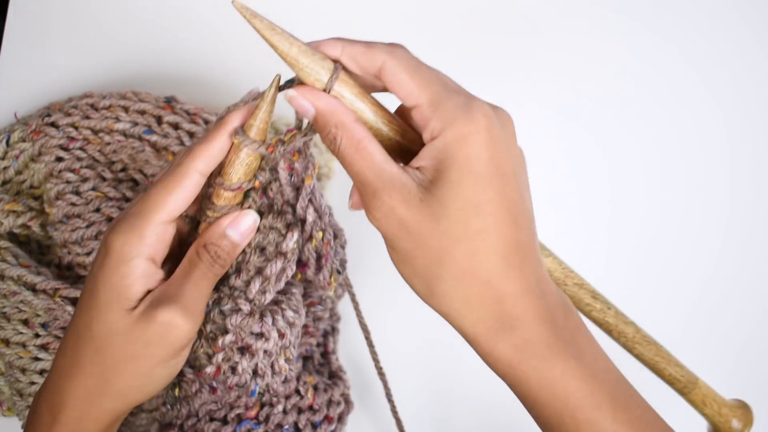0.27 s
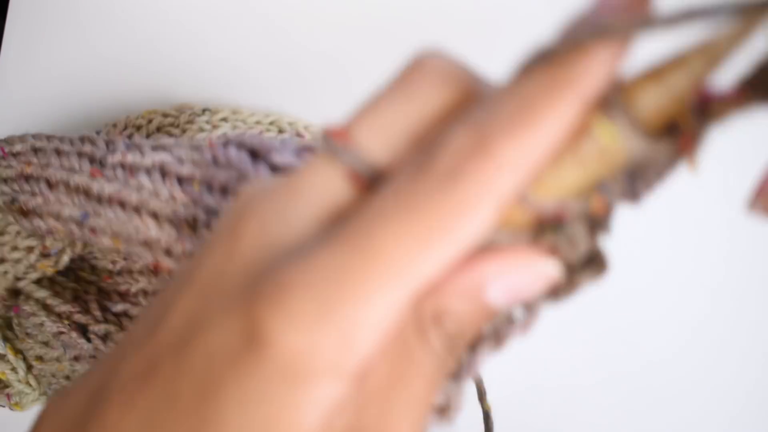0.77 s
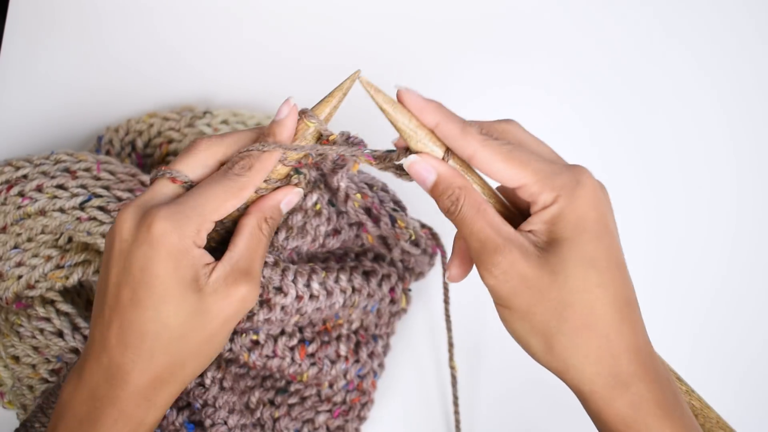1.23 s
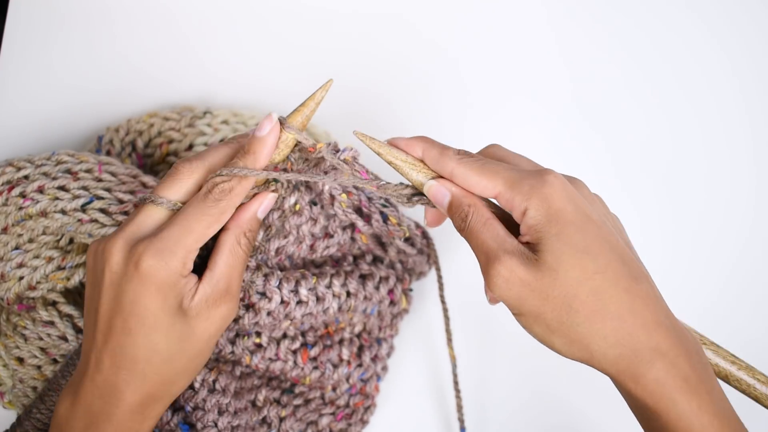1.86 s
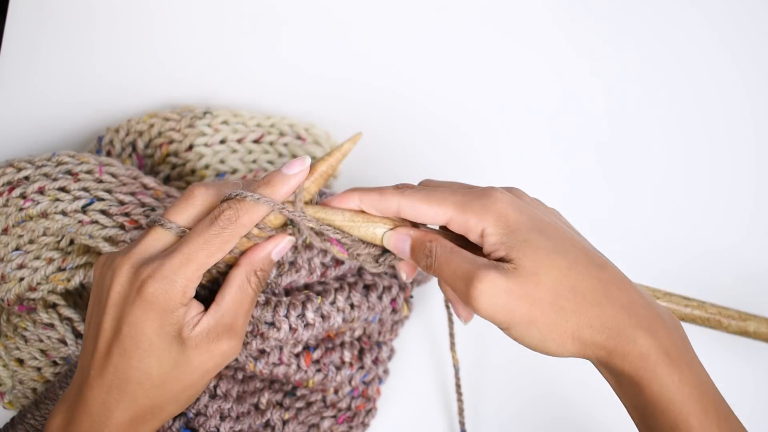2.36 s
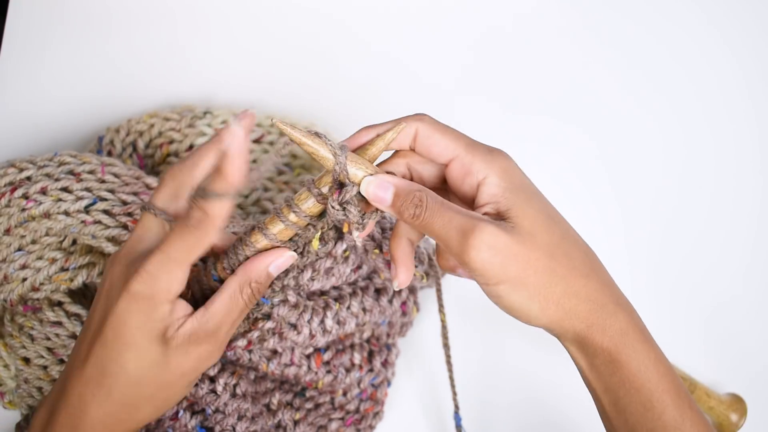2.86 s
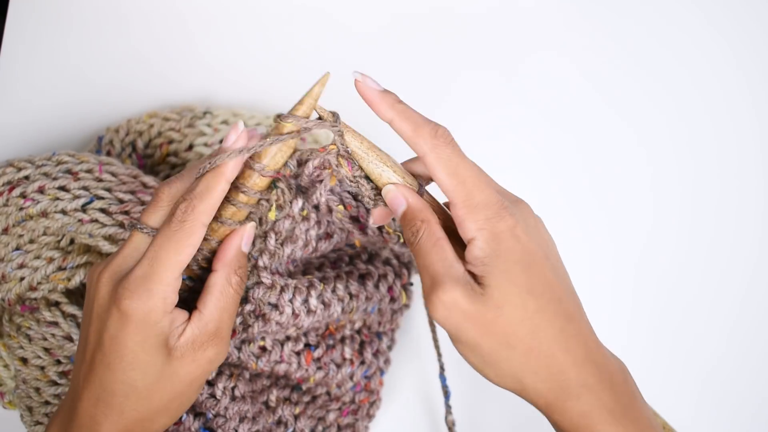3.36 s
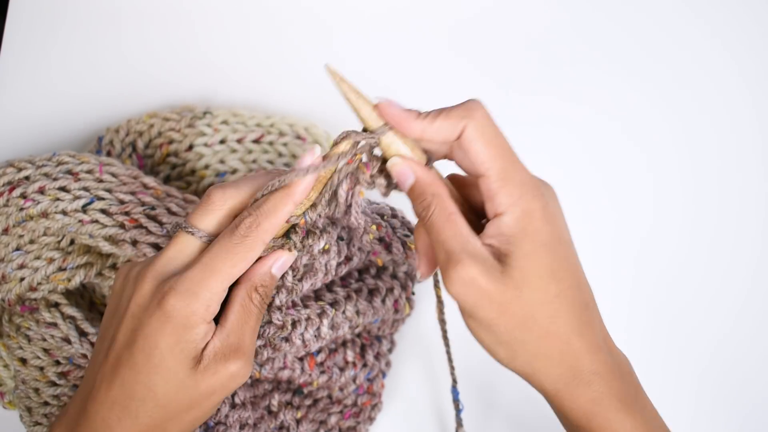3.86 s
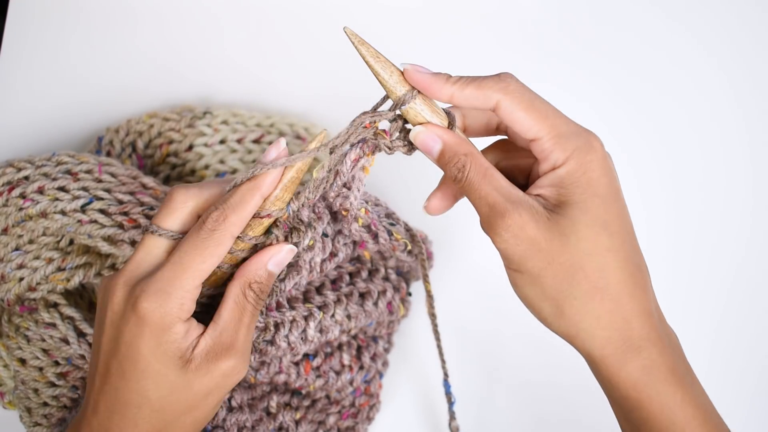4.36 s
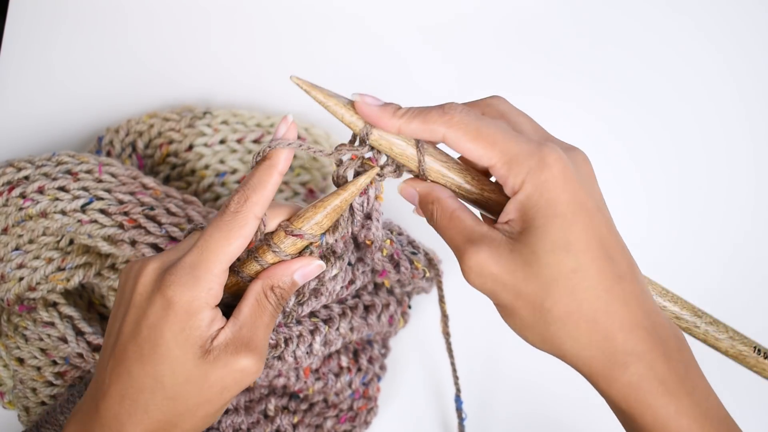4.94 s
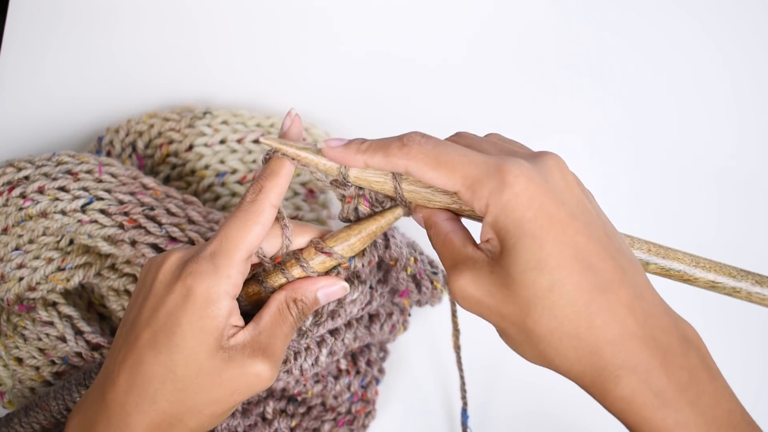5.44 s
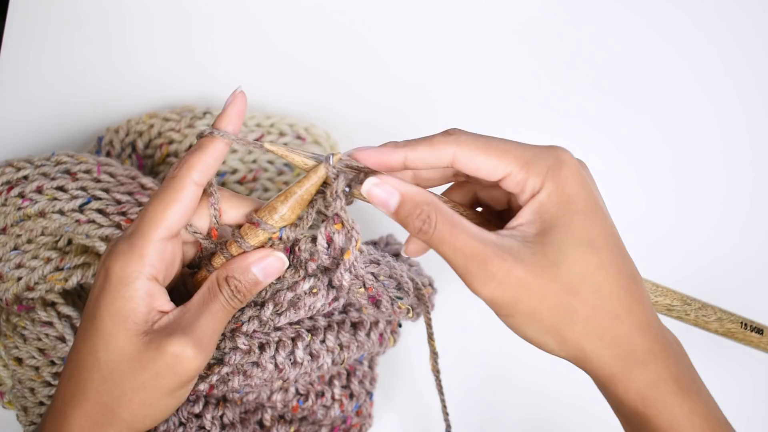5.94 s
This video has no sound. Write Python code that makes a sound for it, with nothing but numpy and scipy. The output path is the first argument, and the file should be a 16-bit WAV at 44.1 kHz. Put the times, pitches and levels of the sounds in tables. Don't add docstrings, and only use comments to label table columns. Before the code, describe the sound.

Close up in a quiet room, thick wooden knitting needles click lightly and brush through wool. Around two seconds the knob end knocks hard on a table three times, with soft scrapes and muffled landings between. Later the needle shafts clack together twice quickly, small ticks follow, and a last firm double knock ends with a sharp snap and a faint drag. Low room tone and slight hiss continue.

```python
import sys
import numpy as np
from scipy import signal
from scipy.fft import rfft, irfft, next_fast_len
from scipy.io import wavfile
from scipy.ndimage import uniform_filter1d

SR = 44100
rng = np.random.default_rng(int(sys.argv[2]) if len(sys.argv) > 2 else 0)


def to_wav(sig):
    pcm = np.clip(np.atleast_2d(sig), -1, 1) * 32767
    pcm = np.round(pcm).astype(np.int16)
    wavfile.write(sys.argv[1], SR, pcm.T)


def elevation(decibels):
    levels = np.asarray(decibels, float)
    return 10 ** (levels / 20)


N = 273420

# start in seconds, strength in dB, shaft ring over it in dB,
# crack over the shaft in dB, favoured board pitch in Hz.
KNOB_KNOCKS = [
    (2.021, -18.5, -10.5, -11.5, 888),
    (2.689, -16.5, -9, -12, 700),
    (3.106, -19.5, -11.5, -13.5, 880),
    (3.126, -26.5, -13, -19, 596),
    (3.705, -37.5, -23.5, -7.5, 610),
    (3.82, -43, -23.5, 0, 600),
    (5.692, -17, -8.5, -12, 910),
    (5.706, -22.5, -16.5, -11, 818),
]
# start in seconds, strength in dB, shaft ring over it in dB,
# crack over the shaft in dB, favoured shaft pitch in Hz.
SHAFT_CLACKS = [
    (0.4336, -40, -5, -6, 1790),
    (4.2713, -31.5, -0.5, -13.5, 1940),
    (4.31, -35.5, -2.5, -11, 1810),
    (4.329, -59, 11, -13, 1840),
]
TIP_SLIPS = [
    (3.4303, -51, 2.5, 10.5, 1190),
    (5.361, -55.5, -4.5, 10.5, 1130),
    (5.919, -29, -18.5, 16.5, 2040),
]
# start in seconds, peak in dB, pitch in Hz.
TIP_TICKS = [(0.8694, -66, 6720), (0.8794, -64, 6260), (1.2347, -45, 4960), (1.256, -57.5, 3180),
             (1.2638, -52.5, 5240), (1.2885, -69, 4260), (1.2913, -53.5, 5500), (1.9924, -56, 4700),
             (2.1498, -57.5, 4800), (2.2174, -60.5, 4850), (4.6094, -67, 4240), (4.7926, -64, 3050),
             (5.0515, -54, 6100), (6.1365, -62, 4610)]
# middle in seconds, length in seconds, level in dB, centre in Hz.
WOOL_STROKES = [(0.197, 0.13, -77, 5000), (.82, 0.02, -77, 3800), (0.88, 0.037, -73, 6500),
                (0.962, 0.057, -71, 5050), (1.03, 0.053, -67.5, 8500), (1.293, 0.022, -61, 4960),
                (1.499, 0.48, -76, 1290), (1.996, 0.045, -66.5, 7040), (2.223, 0.017, -73, 4000),
                (2.467, 0.13, -65, 6500), (2.532, 0.11, -70.5, 2300), (3.027, 0.081, -71.5, 6000),
                (3.227, 0.097, -63.5, 5660), (3.547, 0.15, -72, 5000), (3.949, 0.18, -73.5, 4970),
                (4.403, 0.011, -72, 5000), (4.88, 0.1, -79, 4000), (5.604, 0.073, -63.5, 6500),
                (5.827, 0.12, -69, 5000), (5.831, .11, -68.5, 1700)]
# strongest moment in seconds, length in seconds,
# ring in dB, thump over it in dB.
NEEDLE_DRAGS = [
    (2.25, 0.078, -62, 3),
    (3.245, .07, -60, -8),
    (4, 0.032, -78, 16.5),
    (4.81, 0.064, -69, 5),
    (5.844, 0.11, -55, -16),
    (6.2, 0.079, -59.5, -5),
]
# pitch in Hz, level in dB, t60 in seconds.
TABLE_THUMP = [(68, -25.5, 0.42), (131.6, -8, .14), (238.8, 2.5, 0.15), (299.6, -6.5, 0.085),
               (448, -3.5, 0.05)]
# pitch in Hz, level in dB, t60 in seconds.
BOARD_MODES = [(486, -19, 0.099), (533.5, -3, 0.067), (600, -3.5, 0.1), (701.6, 1.5, 0.051),
               (780, -36.5, 0.065), (874.6, 8.5, 0.043), (888, 4, 0.051), (977, -5, 0.066)]
# pitch in Hz, level in dB, t60 in seconds.
TOP_SWING = [(790, 0, .021)]
# pitch in Hz, level in dB, t60 in seconds.
SHAFT_MODES = [(1030, -6, 0.032), (1144, -1.5, 0.048), (1241, -5, 0.05), (1294, -14, 0.13),
               (1373, -6, 0.041), (1503, -4.5, 0.042), (1596, -8, 0.059), (1940, 3, 0.023),
               (2066, -0.5, 0.026), (2130, -3.5, 0.023), (2253, -6.5, 0.025), (2560, -6, 0.03)]
# pitch in Hz, level in dB, t60 in seconds.
BLUNT_CONTACT = [(2940, 1.5, 0.01), (3140, 3, .022), (3390, -1.5, 0.017), (4000, -6, 0.012),
                 (4505, -11, 0.027), (5080, -12.5, 0.031), (5890, -11.5, 0.011), (6500, -21.5, 0.024),
                 (7750, -22.5, 0.014)]
# pitch in Hz, level in dB, t60 in seconds.
SHARP_CONTACT = [(1600, -17, 0.0039), (2290, 10, 0.0088), (2900, 0.5, 0.017), (3165, 3.5, 0.019),
                 (3700, 9, 0.0038), (4270, -2.5, 0.01), (4610, 1.5, 0.017), (5050, -6, 0.026),
                 (5650, -1.5, 0.0089), (6030, -6.5, 0.021), (6500, -13.5, 0.022), (7400, -11.5, 0.0071),
                 (9000, -20, 0.0093), (10900, -12, .005)]
# centre in Hz, width in Hz, level in dB.
NEEDLE_RESONANCES = [(2100, 260, 1), (2960, 770, 6), (4600, 280, 9), (6000, 360, 4.5), (7500, 320, -11),
                     (10100, 2000, -8)]
# frequency in Hz, t60 in seconds.
ROOM_DECAY = [(150, 0.23), (700, 0.3), (1400, 0.35), (2100, 0.31), (3200, 0.21), (5000, 0.3), (12000, 0.29)]
# frequency in Hz, level in dB.
WALL_REFLECTION = [(300, 0.5), (700, -1), (1400, -0.5), (2100, -5), (2800, -6), (5000, -1.5)]
# frequency in Hz, level in dB per Hz.
ROOM_TONE = [(12, -29), (20, -9), (120, -2), (250, -5.5), (1030, -14.5), (2730, -22), (3720, -18),
             (15900, -29)]
# frequency in Hz, level in dB per Hz.
SIDE_HISS = [(12, -9), (20, -2.5), (221, -12.5), (409, -13.5), (822, -15.5), (1150, -17), (14600, -17.5),
             (15900, -32)]


def knocks():
    out = np.zeros((2, N))
    for s, db, shaft_db, crack_db, board_hz in KNOB_KNOCKS:
        shaft_hz = np.clip(1600 * 2 ** ((db + 18.5) / 12), 1200, 1900)
        knock = blow(db, shaft_db, crack_db, board_hz, shaft_hz, board_focus_db=12.5, shaft_focus_db=7.0,
                     contact=BLUNT_CONTACT, wet_db=-6.5)
        add(out, knock, s)
    return out


def clacks():
    out = np.zeros((2, N))
    for s, *levels, shaft_hz in SHAFT_CLACKS:
        clack = blow(*levels, 830, shaft_hz, board_focus_db=26, shaft_focus_db=12,
                     contact=BLUNT_CONTACT, wet_db=-9.0)
        add(out, clack, s)
    return out


def slips():
    out = np.zeros((2, N))
    for s, *levels, shaft_hz in TIP_SLIPS:
        snap = blow(*levels, 870, shaft_hz, board_focus_db=10, shaft_focus_db=49.5,
                    contact=SHARP_CONTACT, wet_db=-7)
        add(out, snap, s)
    return out


def blow(board_db, shaft_over_db, crack_over_db, board_hz, shaft_hz, board_focus_db, shaft_focus_db, contact, wet_db):
    t = np.arange(round(0.4 * SR)) / SR
    shaft_db = board_db + shaft_over_db
    padded_db = max(0, -shaft_over_db - 15.5)
    thump_db = board_db - 18 + 1.52 * padded_db

    crack = elevation(shaft_db + crack_over_db + 6.5) * ring(contact, t, rise=0.00014)
    shaft = ring(SHAFT_MODES, t, rise=0.00023, favoured_hz=shaft_hz, focus_db=shaft_focus_db)
    hard = crack + elevation(shaft_db + 1.5) * shaft

    swing_db = np.clip(4.3 * (board_db + 17.5), -10, 0)
    swing = -elevation(swing_db) * ring(TOP_SWING, t, rise=0.0011)
    board = ring(BOARD_MODES, t, rise=0.0012, favoured_hz=board_hz, focus_db=board_focus_db)
    board = elevation(board_db - 0.5) * (swing + elevation(-3.5) * board)
    thump = elevation(thump_db + 3) * ring(TABLE_THUMP, t, rise=0.002)

    near_hard = in_room(hard, wet_db, width_db=-48, blur_hz=400)
    return near_hard + in_room(board + thump, wet_db=-11, width_db=-54, blur_hz=111)


def ticks():
    out = np.zeros((2, N))
    t = np.arange(round(0.15 * SR)) / SR
    for s, db, hz in TIP_TICKS:
        modes = [(0.71 * hz, -6, 0.008), (hz, 0, 0.012), (1.29 * hz, -8, 0.006), (2.05 * hz, -8, 0.005)]
        tick = elevation(db + 7.0) * ring(modes, t, rise=0.0001)
        add(out, in_room(tick, wet_db=-9.5, width_db=-38, blur_hz=600), s)
    return out


def wool():
    def needle(f):
        peaks = sum(elevation(g) * f * w / (c * c - f * f + 1j * f * w) for c, w, g in NEEDLE_RESONANCES)
        return 0.35 + np.abs(peaks)

    out = np.zeros((2, N))
    for s, length, db, centre_hz in WOOL_STROKES:
        def colour(f):
            octaves = np.log2((f + 1) / centre_hz)
            return needle(f) * np.exp(-(octaves / 0.92) ** 2 / 2)

        t = np.linspace(-2, 2, round(2 * length * SR))
        rub = noise(colour, patchy_db=-4.5, count=len(t))
        catches = elevation(3.4 * unit(uniform_filter1d(rng.standard_normal(len(t)), size=24)))
        stroke = elevation(db) * np.exp(-t ** 2) * unit(rub * catches)
        add(out, stroke * [[1], [0.1]], max(s - length, 0))
    return out


def drag():
    s, length, ring_db, thump_db = np.transpose(NEEDLE_DRAGS)[:, :, None]

    def through(modes):
        return lambda f: sum(elevation(db) * 1j * f / (c * c - f * f + 2.2j * f / t60) for c, db, t60 in modes)

    def swell(late_s):
        half_lengths = 2 * (np.arange(N) / SR - s - late_s) / length
        return elevation(ring_db - 8 * half_lengths ** 2)

    rubbed = [(599.6, 2, 0.085), (673, 1, 0.068), (885, -3.5, 0.058), (1110, -14.5, 0.012)]
    board = swell(0).sum(0) * noise(through(rubbed), patchy_db=2.5)
    weight = (elevation(thump_db) * swell(0.012)).sum(0)
    return board + weight * noise(through(TABLE_THUMP[2:3]), patchy_db=1.2)


def room_tone():
    return elevation(-65) * noise(lambda f: elevation(along(ROOM_TONE, f)), patchy_db=1.36)


def hiss():
    return elevation(-75.5) * noise(lambda f: elevation(along(SIDE_HISS, f)), patchy_db=1.5)


def in_room(x, wet_db, width_db, blur_hz):
    hz, t, z = signal.stft(rng.standard_normal((2, len(x))), SR, nperseg=256)
    decay = elevation(-60 * t / along(ROOM_DECAY, hz)[:, None])
    tail = signal.istft(z * decay, SR, nperseg=256)[1]
    first_echo = round(0.006 * SR)
    tail = np.pad(tail, ((0, 0), (first_echo, 0)))[:, :len(x)]

    bins = int(blur_hz * len(x) / SR) + 1
    power = uniform_filter1d(uniform_filter1d(np.abs(rfft(x)) ** 2, bins), bins)
    walls = elevation(along(WALL_REFLECTION, np.fft.rfftfreq(len(x), 1 / SR)))
    wet = irfft(rfft(tail) * np.sqrt(np.abs(power)) * walls, len(x)) / np.linalg.norm(tail[0])
    return x * [[1], [0]] + wet * elevation([[wet_db], [wet_db + width_db]])


def ring(modes, t, rise, favoured_hz=1000, focus_db=0):
    hz, db, t60 = np.transpose(modes)[:, :, None]
    scatter_db = 1.5 * rng.standard_normal(db.shape)
    level_db = db + scatter_db - focus_db * np.log2(hz / favoured_hz) ** 2 - 60 * t / t60
    sign = (-1) ** np.arange(len(modes))[:, None]
    x = (sign * elevation(level_db) * np.sin(2 * np.pi * hz * t)).sum(0)
    x = x * (1 - np.exp(-t / rise)) ** 2
    return x / np.abs(x).max()


def noise(response, patchy_db, count=N):
    z = signal.stft(rng.standard_normal(count + 512), nperseg=512)[2]
    field = uniform_filter1d(rng.standard_normal(z.shape), size=8, axis=0)
    field = uniform_filter1d(field, size=8, axis=1)
    x = signal.istft(z * elevation(patchy_db * unit(field)), nperseg=512)[1]
    m = next_fast_len(len(x))
    coloured = irfft(rfft(x, m) * response(np.fft.rfftfreq(m, 1 / SR)), m)
    return unit(coloured[:count])


def unit(x):
    return x / np.sqrt(np.mean(x ** 2) + 1e-20)


def along(points, hz):
    f, v = np.transpose(points)
    return np.interp(np.log(hz + 1), np.log(f + 1), v)


def add(out, x, s):
    part = out[:, round(s * SR):][:, :x.shape[1]]
    part += x[:, :part.shape[1]]


def scene():
    mid, side = knocks() + clacks() + slips() + ticks() + wool()
    mid = mid + drag() + room_tone()
    side = side + hiss()
    return np.array([mid + side, mid - side])


def band_limit(x):
    return signal.sosfilt(signal.butter(12, 16050, fs=SR, output="sos"), x)


def record(dry):
    m = next_fast_len(N)
    band = np.fft.rfftfreq(m, 1 / SR) < 15950
    mix = irfft(rfft(dry, m) * band, m)[:, :N]
    return band_limit(mix)


dry = scene()
out = record(dry)
to_wav(out)
```